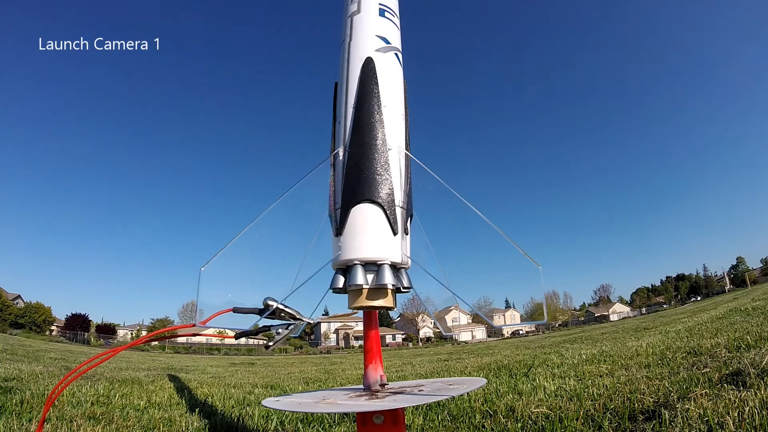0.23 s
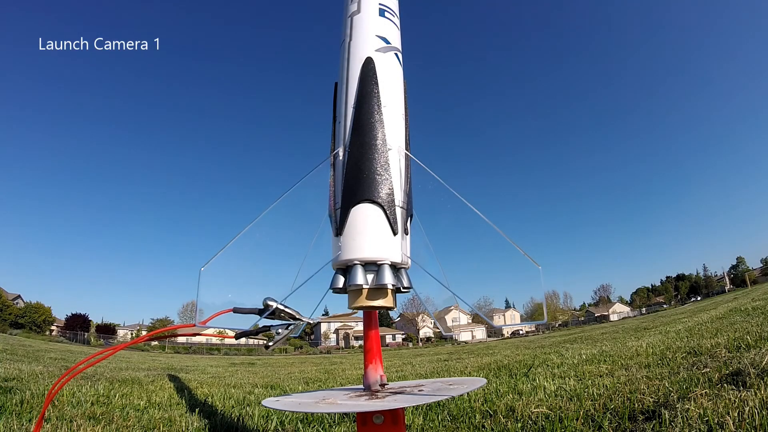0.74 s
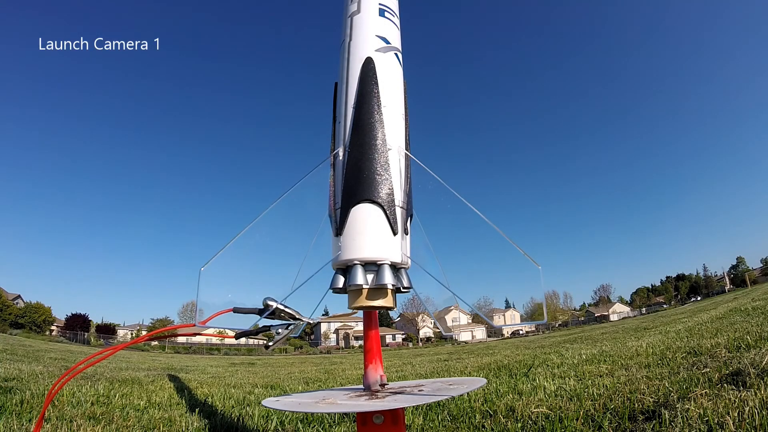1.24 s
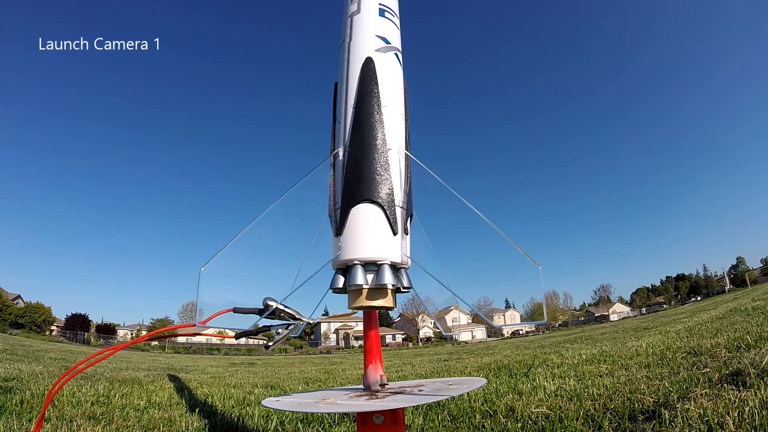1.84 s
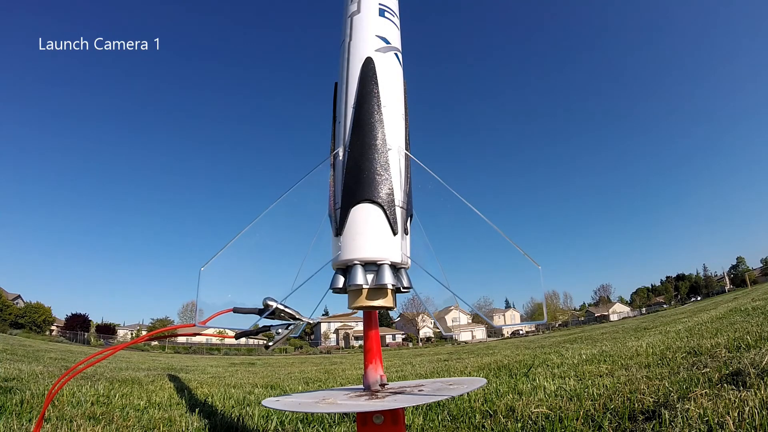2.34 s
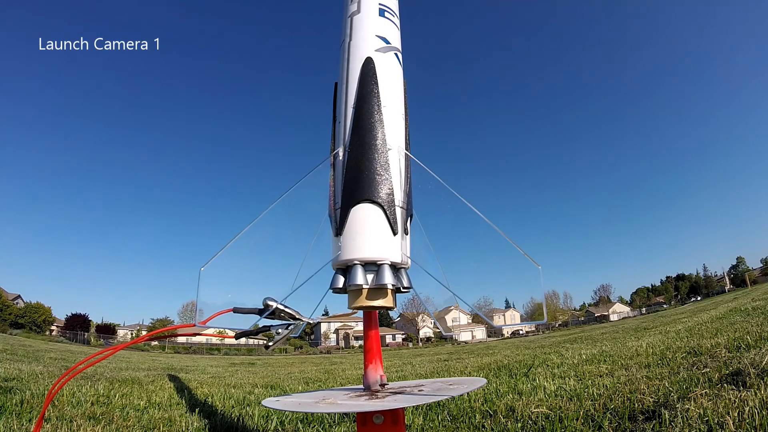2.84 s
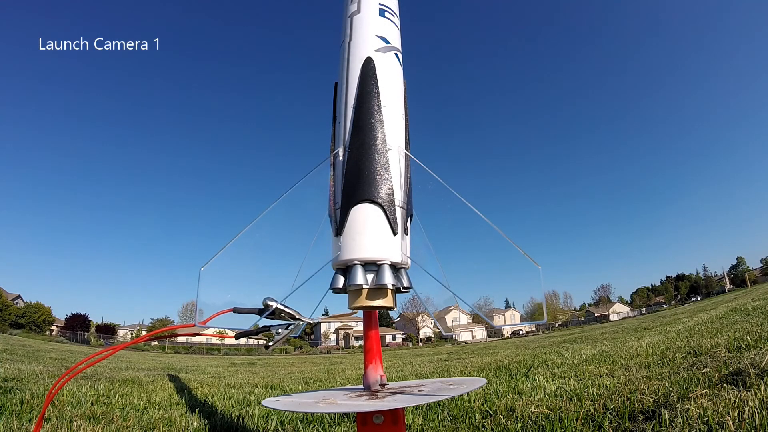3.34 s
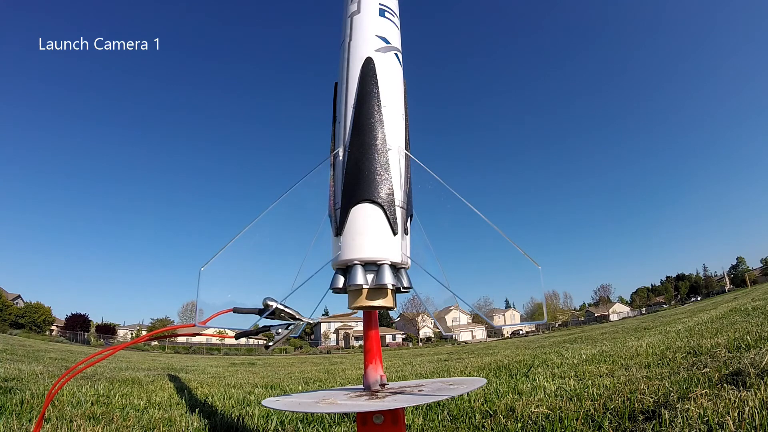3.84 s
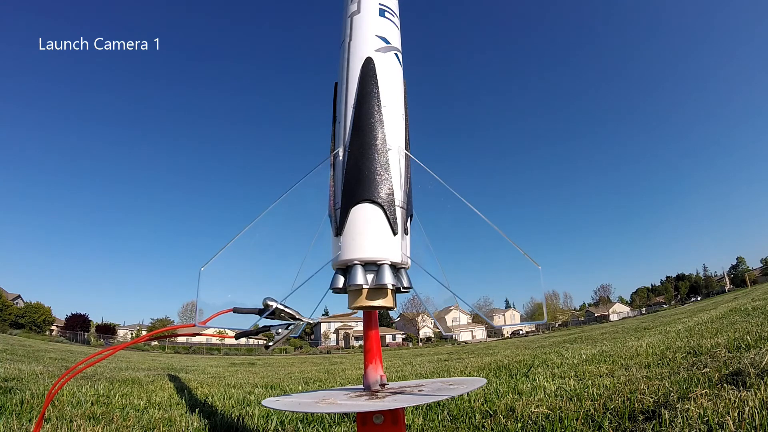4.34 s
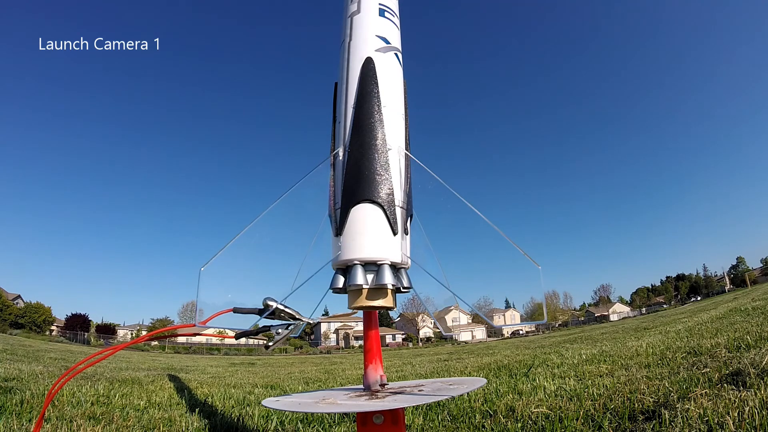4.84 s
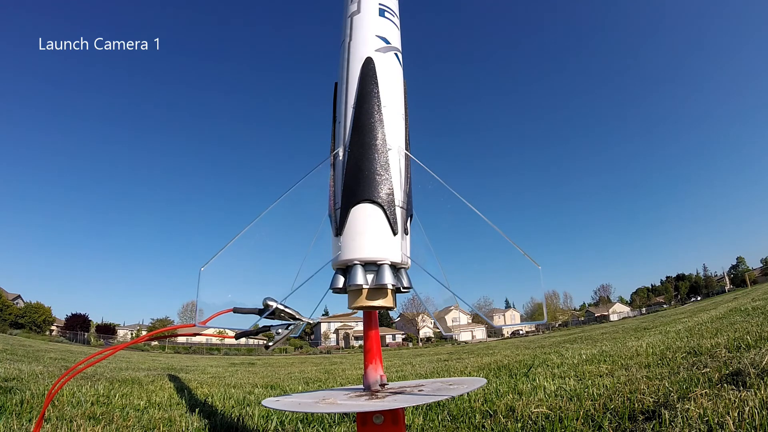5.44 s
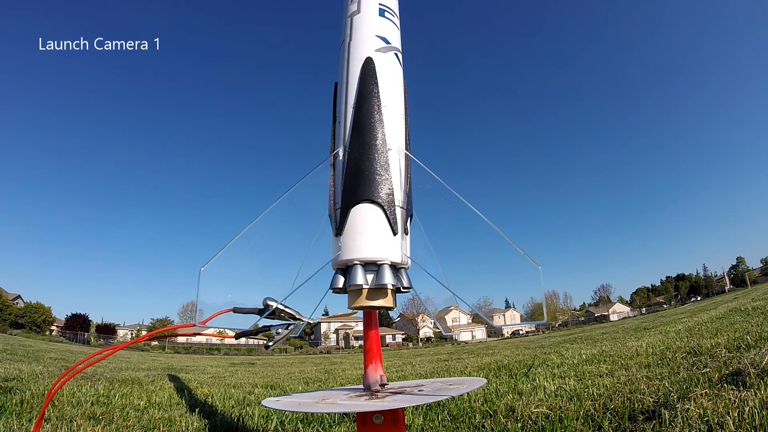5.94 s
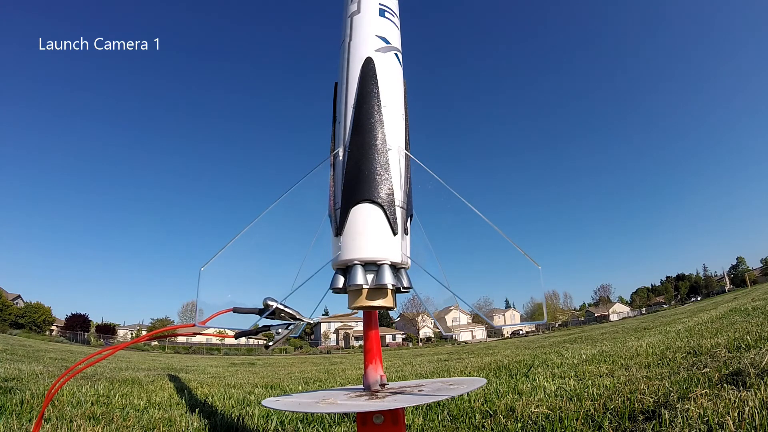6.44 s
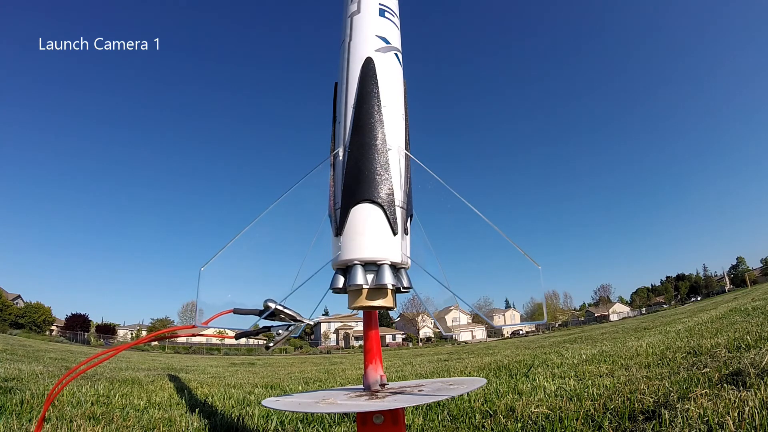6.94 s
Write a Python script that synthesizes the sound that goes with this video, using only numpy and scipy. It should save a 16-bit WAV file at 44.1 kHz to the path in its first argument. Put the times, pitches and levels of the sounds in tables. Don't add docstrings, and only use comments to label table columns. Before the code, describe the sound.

Clear thin birdsong, mostly soft at first and stronger after four seconds, over a low distant rumble, faint machine hum and recorder hiss. Outdoors on grass, dry, with no obvious echo. In the last second or so, a close small igniter catches with tiny brittle pops, peaks as a busy fizz, and sputters into irregular crackles. It has a bright, boxy small-microphone colour and no big blast.

```python
import sys
import numpy as np
from scipy import signal
from scipy.fft import rfft, irfft, next_fast_len
from scipy.io import wavfile
from scipy.ndimage import uniform_filter1d, map_coordinates

SR = 44100
rng = np.random.default_rng(int(sys.argv[2]) if len(sys.argv) > 2 else 0)


def field_ratio(decibels):
    return 10 ** (np.asarray(decibels, dtype=float) / 20)


def unload_wav(signal):
    wavfile.write(
        sys.argv[1],
        SR,
        np.round(np.clip(np.atleast_2d(signal).T, -1, 1) * 32767).astype(np.int16),
    )


N = 316638

# centre_hz, width_hz, level_db
HOUSING_MODES = [(1940, 950, -22.5), (2770, 780, -19.5), (4750, 1010, -2), (5640, 1070, -4),
                 (7950, 1320, -15.5), (10780, 800, -19.5), (12440, 1500, -26.5)]


def at_hz(points, hz):
    point_hz, db = np.transpose(points)
    return np.interp(np.log(hz + 1), np.log(point_hz), db, left=-160, right=-160)


def coloured(spectrum):
    size = next_fast_len(N)
    white = rfft(rng.standard_normal(size)) * np.sqrt(SR / 2)
    hz = np.arange(len(white)) * SR / size
    return irfft(white * field_ratio(at_hz(spectrum, hz)), size)[:N]


def flutter(rate_hz):
    r = np.exp(-2 * np.pi * rate_hz / SR)
    settled = signal.lfilter([1], [1, -2 * r, r * r], rng.standard_normal(N + SR))[SR:]
    return settled / settled.std()


def recorder_hiss():
    # frequency_hz, level_db_per_hz
    hiss_spectrum = [(3000, -122), (4300, -112), (5900, -107), (6400, -99), (7200, -98), (9000, -100),
                     (10300, -103), (11300, -108), (12300, -107), (15000, -112), (16000, -114)]
    return coloured(hiss_spectrum)


def far_traffic():
    # frequency_hz, level_db_per_hz
    rumble_spectrum = [(15, -95), (35, -90.5), (75, -101), (100, -92), (115, -108), (128, -81),
                       (150, -69.5), (175, -70.5), (300, -81.5), (600, -89), (1500, -94), (2700, -99),
                       (3400, -105), (4600, -118)]
    # time_s, level_db
    traffic_level = [(0, 1.5), (1.5, 0.85), (3, 0.66), (4.5, 0.56), (6, 0.8), (7.2, 0.5)]
    t = np.arange(N) / SR
    return coloured(rumble_spectrum) * field_ratio(np.interp(t, *np.transpose(traffic_level)))


def far_machine():
    # frequency_hz, level_db
    hum_tones = [(60, -73), (485, -71)]
    # time_s, level_db
    hum_fade = [(0, 3), (3, -0.5), (4.4, -4), (7.2, -5)]
    t = np.arange(N) / SR
    turning_s = np.cumsum(1 + 0.00295 * flutter(1.52)) / SR
    hum = sum(field_ratio(db + 1) * np.sin(2 * np.pi * hz * turning_s) for hz, db in hum_tones)
    return hum * field_ratio(np.interp(t, *np.transpose(hum_fade)))


def background():
    return far_traffic() + far_machine() + recorder_hiss()


def span(rows, fade_s):
    s, *columns = np.transpose(rows)
    at = np.arange(int((s[0] - fade_s) * SR), int((s[-1] + fade_s) * SR))
    t = at / SR
    ends = np.clip(np.minimum(t - t[0], t[-1] - t) / (2 * fade_s), 0, 1)
    beyond_s = t - np.clip(t, s[0], s[-1])
    turn = np.interp(t, s, np.arange(len(s))) + beyond_s * len(s) / (s[-1] - s[0])
    return at, turn, ends, [np.interp(t, s, column) for column in columns]


def add_tone(out, at, hz, gain):
    phase = 2 * np.pi * np.cumsum(hz) / SR
    out[at] += np.sqrt(2) * gain * np.sin(phase)


def notes():
    # share_of_length, share_of_pitch_step, level_db
    hook = [(0, 0, -5), (.42, .82, 0), (1, 1, -4)]
    glide = [(0, 0, -2), (1, 0.98, -1.5)]
    arch = [(0, 0, -3), (.23, .08, 0), (.45, 0.73, -1), (.72, 0.89, -5), (.84, .66, -3), (1, 0.16, -5)]
    step = [(0, 0, -1), (.25, .06, -1), (.42, .68, -4), (.62, .76, -4), (.78, 1, -2), (1, .1, 0)]
    fall = [(0, 0, -9), (.13, 0.45, 2), (.35, 0.52, -3.5), (.78, .59, -7), (1, 1, -14)]
    peep = [(0, 0, -10), (.14, .5, -2.5), (.38, .81, -4), (.66, 1, 0), (.83, .72, -1), (1, 0, -6)]
    # start_s, length_s, from_hz, to_hz, level_db
    chip_rows = [(0.195, 0.02, 2480, 2370, -58.5), (.41, 0.029, 3060, 2570, -57.5),
                 (.582, .023, 2500, 2030, -61), (.802, .022, 2960, 2420, -60.5),
                 (0.988, 0.03, 2690, 2250, -64), (1.173, .035, 3170, 2490, -61),
                 (1.745, 0.028, 3100, 2790, -72), (4.171, 0.052, 3570, 3410, -59.5),
                 (4.84, 0.0344, 2800, 2060, -65), (4.894, 0.0373, 2740, 2190, -61),
                 (4.97, .04, 2700, 2490, -64), (5.475, 0.0436, 2650, 2250, -56.5),
                 (6.155, 0.01, 2930, 3080, -60)]
    # start_s, length_s, from_hz, to_hz, level_db
    flick_rows = [(0.434, .02, 2630, 3000, -62), (.49, .012, 2520, 2730, -63),
                  (.838, .017, 3890, 4110, -70), (1.45, .03, 3660, 4130, -73),
                  (1.452, .023, 2260, 2210, -63), (1.485, .015, 3510, 3240, -70),
                  (1.69, .045, 2105, 2090, -67), (2.07, .015, 2890, 5900, -67),
                  (2.35, 0.054, 3650, 3600, -73), (2.945, .015, 3750, 3460, -64),
                  (4.45, 0.068, 4300, 3480, -56.5), (4.545, .01, 3930, 4100, -70),
                  (4.565, 0.011, 3820, 3760, -67), (4.898, 0.034, 5470, 6060, -66),
                  (5.52, .028, 2300, 2380, -66), (5.545, 0.015, 3550, 3290, -66),
                  (5.585, .013, 3050, 3170, -66), (5.758, .012, 4480, 3740, -62),
                  (5.78, .01, 4330, 3710, -60), (5.796, .011, 4520, 3770, -56),
                  (5.995, .065, 2310, 2600, -62), (6.163, .025, 3130, 1980, -59),
                  (6.53, 0.044, 2470, 2750, -60), (6.79, .022, 2410, 2530, -59)]
    # start_s, length_s, foot_hz, top_hz, level_db
    arch_rows = [(2.954, 0.13, 2480, 3490, -63.5), (3.215, 0.12, 2450, 3370, -64.5),
                 (3.481, .135, 2500, 3480, -70)]
    # start_s, length_s, foot_hz, top_hz, level_db
    step_rows = [(2.305, .122, 2450, 3400, -63), (2.73, .116, 2420, 3420, -62)]
    # start_s, length_s, from_hz, to_hz, level_db
    fall_rows = [(1.86, .132, 5670, 4030, -64.5), (4.92, 0.19, 5830, 3910, -55.5)]
    # start_s, level_db
    phrase_starts = [(.706, -62.5), (1.728, -64), (2.764, -63), (3.821, -61), (4.789, -55.5), (5.738, -55)]
    peep_length_s, peep_foot_hz, peep_top_hz = .058, 4320, 5720
    peep_rows = [(s, peep_length_s, peep_foot_hz, peep_top_hz, db) for s, db in phrase_starts]
    kinds = [(hook, chip_rows), (glide, flick_rows), (arch, arch_rows),
             (step, step_rows), (fall, fall_rows), (peep, peep_rows)]
    return [[(s + part * length, a_hz + way * (b_hz - a_hz), db + shape_db) for part, way, shape_db in shape]
            for shape, rows in kinds
            for s, length, a_hz, b_hz, db in rows]


def whistles():
    out = np.zeros(N)
    for rows in notes():
        at, turn, ends, (straight_hz, db) = span(rows, fade_s=0.002023)
        curved_hz = map_coordinates(np.array(rows, float)[:, 1], [turn], order=2, mode="nearest")
        pitch_hz = uniform_filter1d((straight_hz + curved_hz) / 2, size=177)
        add_tone(out, at, pitch_hz, ends * field_ratio(db))
    return out


def crests(s, length, db, first_db, fade_db, lasting=3.0, linger=.035):
    spacing_s, quicken_s = .0292, .00045
    crest_hz, last_hz, wobble_hz = 5270, 4150, 1150
    end_db, end_drop_hz = -76, 270
    k = np.arange(12.)
    after = k * (spacing_s - quicken_s * k)
    k = k[:np.sum(after < length - spacing_s / 2) + 1]
    after = np.append(after[:len(k) - 1], length)
    sag = np.clip((after - spacing_s) / (length - 2 * spacing_s), 0, 1)
    hz = crest_hz + sag * (last_hz - crest_hz)
    level = db + fade_db * sag ** 1.5
    hz[-1] = last_hz - end_drop_hz
    level[0], level[-1] = first_db, end_db
    drop_hz = wobble_hz * (linger + np.exp(-(k / lasting) ** 2))
    return np.transpose([s + after, hz, level, drop_hz])


def warbles(trough_db_per_khz=-11, bend=1.9, late=.07):
    # first_crest_s, length_s, level_db, first_crest_db, fade_by_last_crest_db
    warble_rows = [(.8315, .165, -62, -95, -12), (2.885, .178, -59.5, -70, -4),
                   (3.951, .187, -59.5, -67, -4), (5.862, .158, -54, -65, -14)]
    out = np.zeros(N)
    for row in warble_rows:
        rows = crests(*row)
        at, turn, ends, (hz, db, drop_hz) = span(rows, fade_s=.014)
        skewed = turn - late * np.sin(np.pi * turn) ** 2
        away = np.abs(2 * ((skewed + .5) % 1) - 1)
        trough_db = trough_db_per_khz * (drop_hz / 1000) ** 2 * away ** 4.3
        pitch_hz = uniform_filter1d(hz - drop_hz * away ** bend, size=133)
        onset = np.minimum(6 * ends, 1)
        release = np.clip((rows[-1][0] + .004 - at / SR) / .004, 0, 1)
        add_tone(out, at, pitch_hz, onset * release * field_ratio(db + trough_db))
    return out


def pulses(curve, uneven_db=2.2, uneven_pitch=.015):
    s, hz, db, fall, spacing_s = np.transpose(curve)
    at = [s[0]]
    while at[-1] + np.interp(at[-1], s, spacing_s) <= s[-1]:
        at.append(at[-1] + np.interp(at[-1], s, spacing_s))
    off = rng.standard_normal((40, 2))[:len(at)]
    pitch_hz = np.interp(at, s, hz) * (1 + uneven_pitch * off[:, 0])
    level_db = np.interp(at, s, db) + uneven_db * off[:, 1]
    return np.transpose([at, pitch_hz, level_db, np.interp(at, s, fall)])


def trills(bow=.4, sharp=2.8):
    # time_s, pitch_hz, level_db, pitch_fall_share, pulse_spacing_s
    trill_curves = [
        [(4.249, 4050, -73, .09, .017), (4.295, 4280, -72, .09, .0145), (4.34, 4450, -65, .09, .014),
         (4.4, 4840, -59, .09, .015), (4.445, 4720, -60, .09, .0145)],
        [(4.936, 2330, -61, .06, .012), (5.0, 2580, -63, .07, .013), (5.04, 2900, -64, .11, .016),
         (5.09, 3390, -64, .18, .016), (5.15, 3500, -59, .26, .0185), (5.19, 4050, -63, .3, .019),
         (5.215, 3700, -60, .34, .018)],
        [(5.57, 2400, -61, .06, .011), (5.605, 2700, -61, .06, .015), (5.665, 3080, -61, .06, .0165),
         (5.7, 3800, -61, .1, .017), (5.73, 3480, -62, .14, .018), (5.8, 3850, -62, .14, .019),
         (5.84, 4250, -58, .12, .016), (5.86, 4050, -62, .12, .015)],
    ]
    out = np.zeros(N)
    for curve in trill_curves:
        at, turn, ends, (hz, db, fall) = span(pulses(curve), fade_s=0.012)
        within = (turn + .5) % 1 - .5
        pitch_hz = hz * (1 - fall * within - bow * within ** 2)
        swell = np.abs(np.cos(np.pi * within)) ** sharp
        add_tone(out, at, pitch_hz, field_ratio(db + 0.5) * swell)
    return out


def birds(shimmer_db=2.0, sway_db=1.0):
    air_db = shimmer_db * flutter(95) + sway_db * flutter(25)
    return (whistles() + warbles() + trills()) * field_ratio(air_db)


def resonance(x, hz, width_hz):
    r = np.exp(-np.pi * width_hz / SR)
    feedback = [1, -2 * r * np.cos(2 * np.pi * hz / SR), r * r]
    return signal.lfilter((1 - r * r) / 2 * np.array([1, 0, -1]), feedback, x)


def housing(clicks, widen=2.07):
    out = 0
    for k, (hz, width_hz, db) in enumerate(HOUSING_MODES):
        rung = clicks[k % len(clicks)]
        for _ in range(3):
            rung = resonance(rung, hz, widen * width_hz)
        out = out + (-1) ** k * field_ratio(db) * rung
    return out


def pops(s, level_db):
    # time_s, peak_db
    loud_pops = [(6.1106, -32.5), (6.1246, -35), (6.201, -37), (6.3091, -42), (6.3524, -33), (6.4332, -35),
                 (6.467, -36), (6.472, -36), (6.4982, -26), (6.5151, -32), (6.522, -23.5), (6.5357, -32),
                 (6.5484, -31), (6.5912, -31), (6.5932, -33), (6.5992, -33), (6.608, -30), (6.611, -32),
                 (6.6162, -26), (6.6203, -30), (6.63, -29), (6.634, -22.5), (6.6412, -24), (6.6534, -29),
                 (6.6709, -33), (6.687, -29), (6.6938, -27), (6.6996, -34), (6.707, -33), (6.7081, -35),
                 (6.7498, -34), (6.7614, -18.5), (6.7662, -34), (6.7708, -32), (6.7914, -34),
                    (6.8065, -23), (6.81, -28), (6.8143, -32), (6.8204, -36), (6.8265, -21.5),
                    (6.8563, -27), (6.8583, -23), (6.8643, -36), (6.8815, -35), (6.8845, -27),
                    (6.911, -29.5), (6.9214, -31), (6.975, -34), (6.9806, -34), (7.0281, -30),
                    (7.0376, -35), (7.057, -28.5), (7.069, -34), (7.0771, -31), (7.0974, -30),
                    (7.1073, -35), (7.1179, -24.5), (7.1479, -33), (7.156, -33), (7.1778, -31)]
    # time_s, level_db
    stand_out = [
        (6.1, 8),
        (6.6, 9),
        (6.8, 13),
    ]
    count, from_s, spread_db = 64, 6.04, 4.0
    chance = rng.random((count, 2))
    slot = (np.arange(count) + chance[:, 0]) / count
    at = from_s + (N / SR - .003 - from_s) * slot
    peak_db = np.interp(at, s, level_db) + np.interp(at, *np.transpose(stand_out))
    peak_db += spread_db * (2 * chance[:, 1] - 1)
    return np.hstack([np.transpose(loud_pops), [at, peak_db]])


def igniter(spread_db=5.0, smooth_db=-9, after_s=.0006, colour_db=0.5, dull_db=-1.5,
            clump_db=0.5, thin_db=9, warm_s=6.33):
    # time_s, level_db, small_pops_per_s
    fizz_curves = [
        [(5.93, -65, 2300), (6.02, -61, 2000)],
        [(6.055, -54, 2500), (6.261, -50, 2200), (6.517, -43.5, 2100), (6.675, -49, 1740), (6.827, -53, 1400),
         (7.061, -53.5, 1160), (7.18, -57, 1900)],
    ]
    s, level_db, per_s = np.concatenate(fizz_curves).T
    t = np.arange(N) / SR
    octaves = np.log2(np.array(HOUSING_MODES)[:, :1] / 5600)
    unit = housing(np.eye(1, 400))

    per_sample = np.interp(t, s, per_s) / SR
    sizes = field_ratio(spread_db * np.minimum(rng.exponential(1, N), 2.4)) * rng.choice([-1, 1], N)
    grains = sizes * (rng.random(N) < per_sample) / np.sqrt(per_sample) / 2.07
    gas = field_ratio(smooth_db) * rng.standard_normal(N)
    level = field_ratio(np.interp(t, s, level_db, left=-120) + clump_db * flutter(40))
    train = (grains + gas) * level / np.sqrt(np.sum(unit ** 2)) + 1e-18
    fizz = np.tile(train, (len(HOUSING_MODES), 1))
    young = np.clip((warm_s - t) / .35, 0, 1)
    fizz *= field_ratio(thin_db * young * np.minimum(octaves, 0))

    at, peak_db = pops(s, level_db)
    at = (at * SR).astype(int) - np.argmax(np.abs(signal.hilbert(unit)))
    chance = rng.random((len(at), 3))
    colour = field_ratio(colour_db * rng.standard_normal((len(at), len(HOUSING_MODES)))).T
    colour *= field_ratio(dull_db * np.maximum(octaves, 0))
    size = colour * field_ratio(peak_db - 1.0) * np.sign(chance[:, 0] - .5) / np.abs(unit).max()
    fizz[:, at] += size
    second_at = at + (after_s * SR * (3.0 * chance[:, 1] - 1.1)).astype(int)
    fizz[:, second_at] += 0.62 * size * (2 * chance[:, 2] - 1)
    return housing(fizz)


def scene():
    mono = background() + birds() + igniter()
    return np.array([mono, mono])


def band_limit(x):
    return signal.sosfilt(signal.butter(12, 15690, fs=SR, output="sos"), x)


def record(dry):
    low_pass = signal.cheby2(16, 50, 15780, fs=SR, output="sos")
    mix = signal.sosfilt(low_pass, dry)
    return band_limit(mix)


dry = scene()
out = record(dry)
unload_wav(out)
```